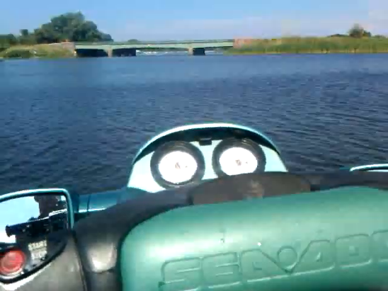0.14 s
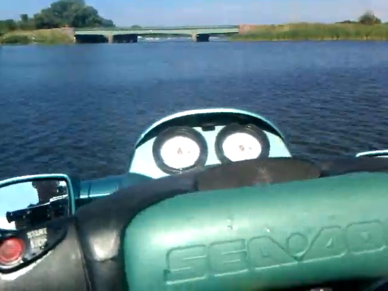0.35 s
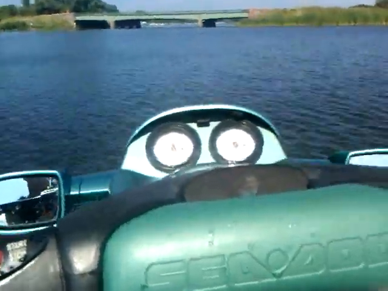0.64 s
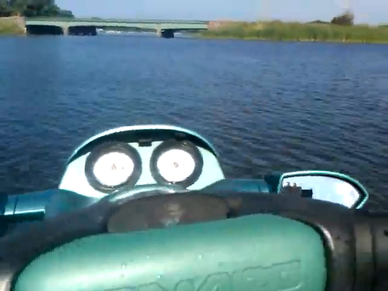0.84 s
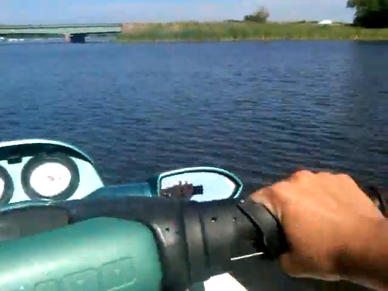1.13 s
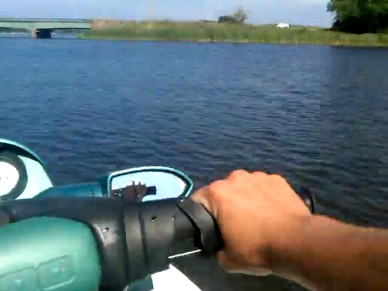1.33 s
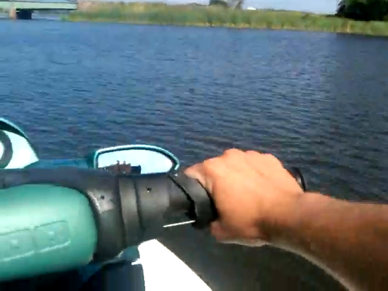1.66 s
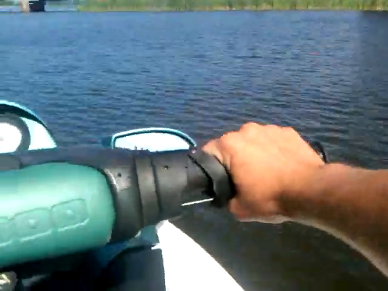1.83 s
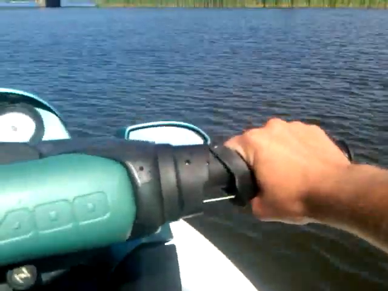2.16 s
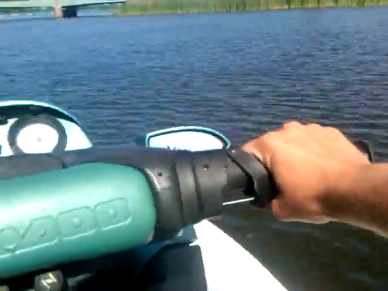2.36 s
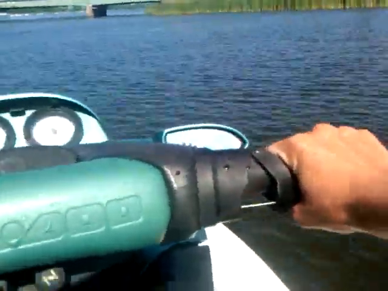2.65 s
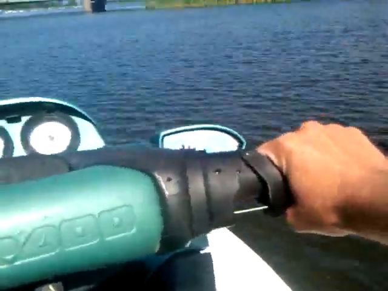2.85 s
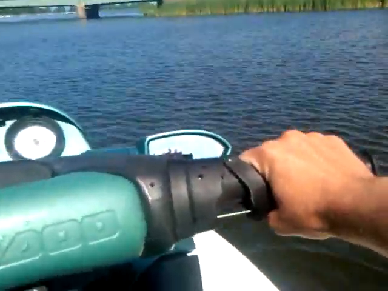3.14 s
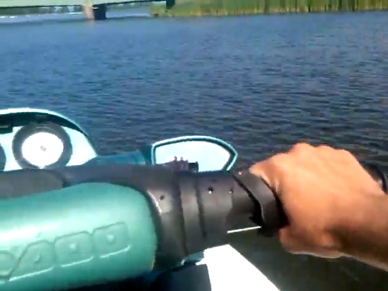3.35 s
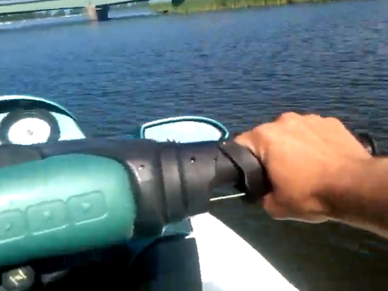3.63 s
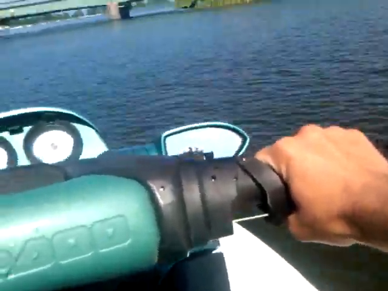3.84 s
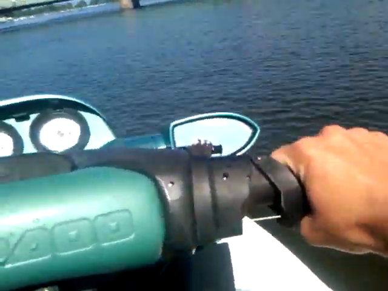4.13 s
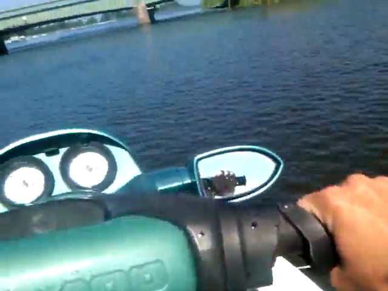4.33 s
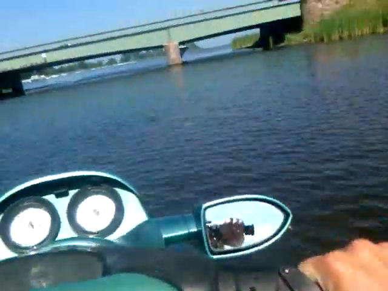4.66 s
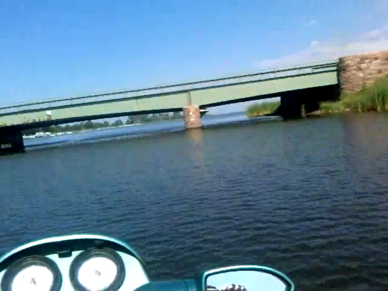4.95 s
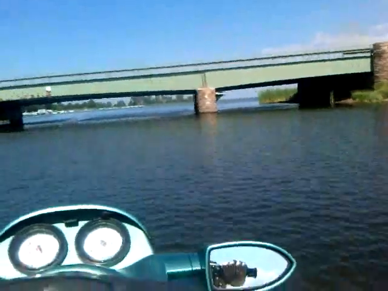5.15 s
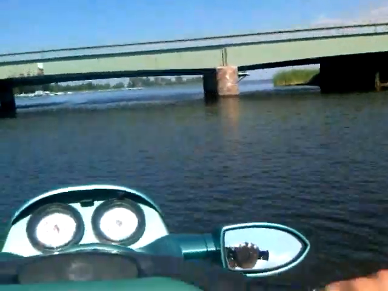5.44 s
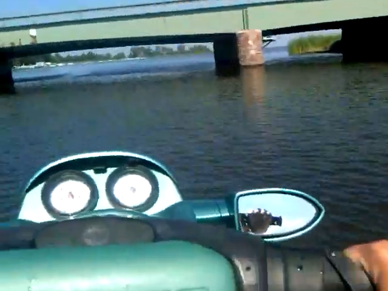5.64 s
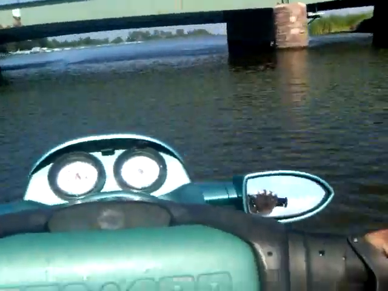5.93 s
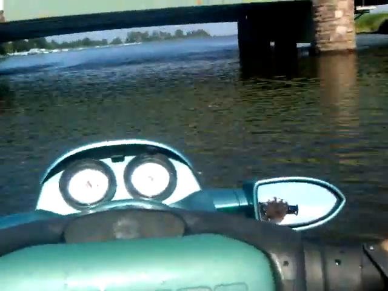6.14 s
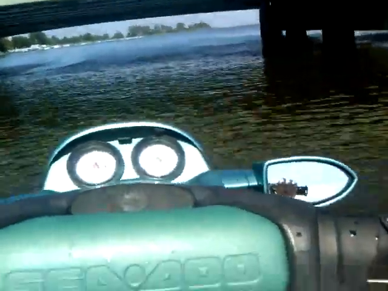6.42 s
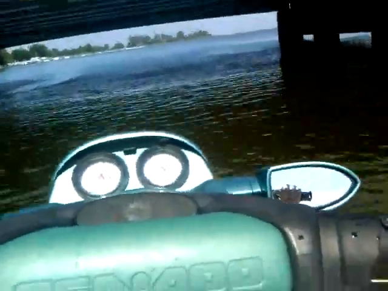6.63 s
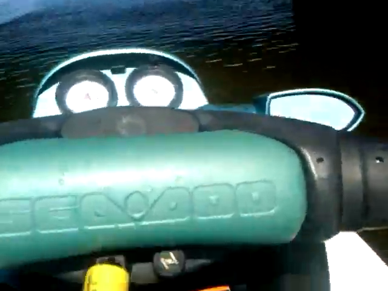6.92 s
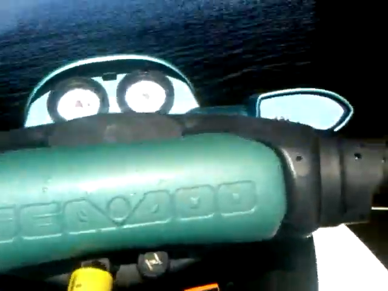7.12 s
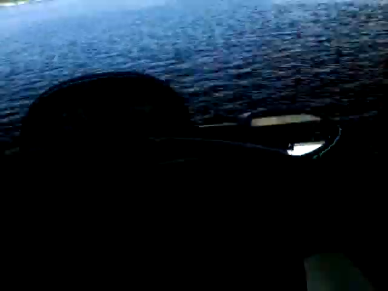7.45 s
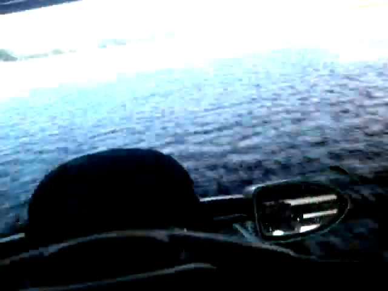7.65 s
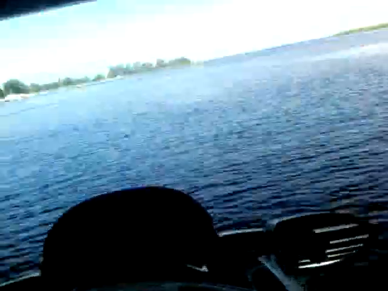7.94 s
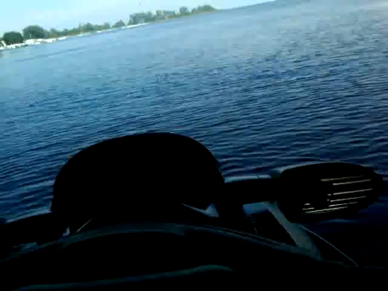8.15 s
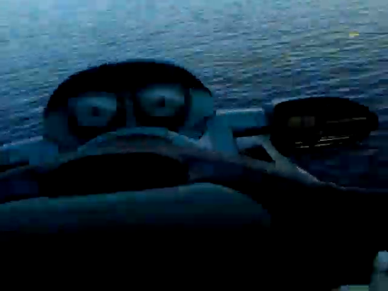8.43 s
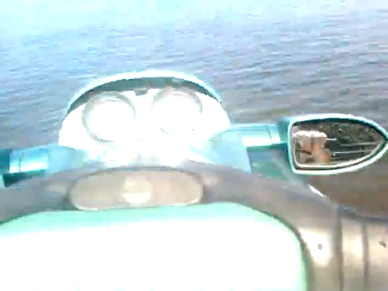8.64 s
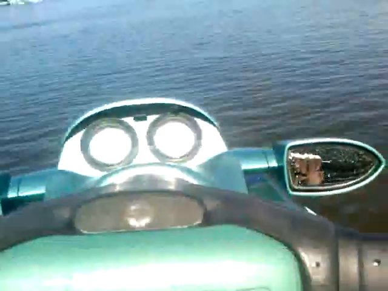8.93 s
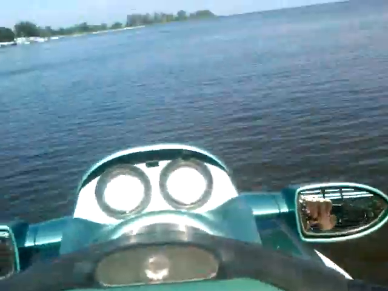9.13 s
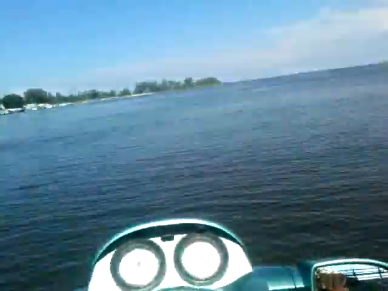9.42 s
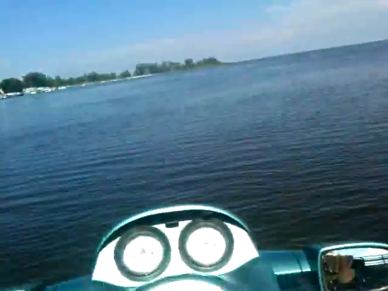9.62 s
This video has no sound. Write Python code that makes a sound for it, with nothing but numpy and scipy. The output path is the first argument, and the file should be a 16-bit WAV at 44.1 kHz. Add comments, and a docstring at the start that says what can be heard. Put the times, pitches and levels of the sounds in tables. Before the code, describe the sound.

A fast personal watercraft heard at its handlebar: a buzzing mid-low engine note, fluttering and uneven, is chopped by wind buffeting a clipping, dull-topped microphone. Thumping gusts briefly smother fine spray hiss, spatter and short splashes. The note stays level for seven seconds, falls as the rider backs off, and continues gliding downward to the end, with wind still rumbling.

```python
"""Personal watercraft easing off

A personal watercraft runs at speed over open water, then eases off the throttle after seven seconds.
Its engine and drive sound as sines locked to the shaft, with a noise rasp at each firing.
Wind is coloured noise plus short pressure swings; spray is spurting hiss, splashes and dull knocks.
The head wind overloads the rider's microphone: saturation chops it all into a rough, flat-topped roar.
"""
import sys
import numpy as np
from scipy import signal
from scipy.fft import rfft, irfft, next_fast_len
from scipy.io import wavfile
from scipy.ndimage import uniform_filter1d, map_coordinates

SR = 44100
rng = np.random.default_rng(int(sys.argv[2]) if len(sys.argv) > 2 else 0)


def file_out(sig):
    """Save sig as 16-bit WAV at sys.argv[1]."""
    # one column per channel
    cols = np.atleast_2d(sig).T
    # limit, then scale
    lim = np.clip(cols, -1, 1)
    pcm = np.round(lim * 32767).astype(np.int16)
    wavfile.write(sys.argv[1], SR, pcm)


N = 431286

# All levels in the tables are relative; the functions trim and mix them.
# crankshaft speed: t/s, f/Hz
SHAFT_SPEED = [(0, 113), (1.2, 113.6), (2.5, 113.2), (4, 113.4), (5.5, 113.2), (6.2, 113.8), (7.1, 113.6),
               (7.3, 112), (7.55, 108), (7.7, 101), (7.85, 95), (8, 90.5), (8.5, 83.5), (8.8, 80.7),
               (9.05, 78.5), (9.45, 75), (9.78, 70.5)]
# engine orders: multiple of the shaft speed, level/dB
ENGINE_ORDERS = [(1, -2.5), (2, -3.27), (3, 0.6), (4, -8.5), (5, -18.5), (7, -16), (9, -15.5), (10, -15.5),
                 (21, -19)]
# loudness of the engine: t/s, firing order level/dB, level of all other orders/dB
ENGINE_LEVEL = [(0, -22.5, -24), (.33, -28, -29), (.5, -25, -29.5), (.65, -25.5, -21.5),
                (.85, -21.5, -30.5), (1.18, -26.5, -26.5), (1.45, -30.5, -25.5), (1.75, -25, -23.5),
                (1.95, -28.5, -26), (2.2, -22, -25.5), (2.85, -25.5, -26.5), (3.05, -22.5, -24.5),
                (3.5, -26.5, -22.5), (4.05, -26.5, -26), (4.25, -32.5, -24.5), (4.5, -22.5, -21.5),
                (4.8, -36.5, -36.5), (5.15, -28.5, -31.5), (5.5, -37, -30.5), (5.85, -26, -28),
                (6.15, -25.5, -22), (6.5, -28, -28), (6.82, -38.5, -27.5), (7.05, -20.5, -22.5),
                (7.4, -33, -25.5), (7.8, -22.5, -25.5), (8.05, -32, -29), (8.25, -38.5, -49),
                (8.42, -27.5, -24), (8.54, -23, -32.5), (8.65, -36.5, -26), (8.8, -23, -37),
                (8.92, -32, -25), (9.03, -25, -12), (9.15, -30.5, -31), (9.33, -30.5, -26),
                (9.46, -25.5, -22), (9.59, -33.5, -39), (9.7, -24.5, -22), (9.78, -28.5, -38)]
# resonances of exhaust and hull, which each order lights up as it slides through: f/Hz, level/dB
PIPE_RESONANCE = [(70, -11.5), (113, 0.5), (165, -10), (215, 1.5), (250, -2.5), (280, -5), (315, -2),
                  (341, -0.5), (359, 11), (375, 13), (392, -6), (450, -2), (800, -2)]
# gusts that overload the diaphragm: t/s, length/s, push level/dB
GUST_EVENTS = [(0.058, 0.028, -6), (0.588, 0.034, -11.5), (0.686, 0.056, -11), (2.544, 0.039, -9),
               (2.815, 0.024, -10), (3.391, 0.035, -8.5), (3.959, 0.027, -9), (4.1, 0.024, -9),
               (4.319, 0.027, -1), (4.6, 0.015, -5.5), (4.886, 0.022, -11), (4.979, 0.015, -11),
               (5.063, 0.058, -6.5), (5.196, 0.028, -5), (5.382, 0.026, -8.5), (5.418, 0.016, -8.5),
               (5.491, .03, -10), (5.97, 0.043, -5), (6.042, 0.05, -11), (6.485, .02, -9.5),
               (6.599, 0.034, -3), (6.644, 0.019, -9.5), (6.768, 0.061, -14), (6.995, 0.04, -11),
               (7.493, 0.035, -6), (7.687, 0.02, -9.5), (7.91, 0.01, -5.5), (7.94, 0.044, -5),
               (8.201, 0.018, -8.5), (8.338, 0.016, -6.5), (8.422, 0.037, -3.5), (8.592, 0.033, -13),
               (8.695, 0.012, -11), (8.872, 0.028, -11), (8.919, 0.04, -8.5), (9.339, 0.032, -10.5)]
# head wind at the microphone: t/s, buffet level/dB, rush level/dB
WIND_LEVEL = [(0, -22.5, -25), (.65, -19.5, -23), (.85, -20.5, -22.5), (1.15, -29, -24.5),
              (1.35, -19, -23.5), (1.7, -18.5, -23), (2.2, -16, -21.5), (3.3, -21, -24), (4.1, -21.5, -24),
              (4.67, -21, -25.5), (4.78, -23.5, -30.5), (5.05, -18.5, -26), (5.26, -22.5, -30),
              (5.5, -20, -28), (6.15, -20, -22), (6.85, -21, -28), (7.13, -14, -22), (7.3, -22, -23),
              (7.7, -18, -23.5), (8.05, -18.5, -24.5), (8.25, -25, -30.5), (8.4, -23, -30),
              (8.53, -23, -25), (8.68, -23, -29.5), (8.8, -20.5, -28.5), (8.9, -21.5, -27), (9.1, -21, -26),
              (9.33, -19.5, -30), (9.5, -23, -33), (9.6, -20, -30), (9.78, -31, -31.5)]
# spectrum of the slow wind eddies: f/Hz, level per Hz/dB
BUFFET_SPECTRUM = [(8, -31), (22, 2), (40, 2), (80, -1.5), (150, -7), (300, -14.5), (600, -17), (1500, -38),
                   (4000, -86.5)]
# spectrum of the wind rush, shared by the engine's rasp: f/Hz, level per Hz/dB
RUSH_SPECTRUM = [(100, -32.5), (300, 0), (600, -3), (1100, -4.5), (1800, -2.5), (2500, -2), (3300, -10.5),
                 (5000, -21.5), (7500, -49.5)]
# spray thrown up by the hull: t/s, level/dB
SPRAY_SWELL = [(0, -40), (.75, -48.5), (1.0, -32.5), (1.35, -45), (1.8, -41), (2.1, -49), (2.55, -38.5),
               (2.9, -32), (3.8, -33.5), (4.5, -33.5), (5.3, -36), (6.3, -35), (6.85, -42), (7.15, -42),
               (7.7, -39.5), (8.5, -47.5), (9.5, -54), (9.78, -41)]
# spectrum of the spray hiss: f/Hz, level per Hz/dB
SPRAY_SPECTRUM = [(1000, -31), (2300, 5), (3300, -6.5), (3800, -8), (4020, 1.5), (4300, -4.5), (5200, -3),
                  (7400, -14)]
# slaps of spray: t/s, length/s, level/dB
SLAP_EVENTS = [(1.78, 0.11, -31), (3.28, 0.0039, -28), (4.294, 0.0098, -32), (4.66, 0.049, -31.5),
               (5.266, 0.017, -23.5), (5.94, 0.018, -31), (6.703, 0.015, -31), (7.185, 0.022, -29.5),
               (7.865, 0.024, -33), (7.898, 0.011, -24), (8.269, 0.0069, -27.5), (8.51, 0.11, -37.5),
               (8.666, 0.013, -35.5), (9.14, 0.06, -35.5)]
# splashes against the hull: t/s, length/s, pitch f/Hz, level/dB
SPLASH_EVENTS = [(1.608, 0.018, 882, -16.5), (3.212, 0.017, 2380, -32.5), (3.454, 0.026, 2205, -19.5),
                 (4.448, 0.016, 996, -20), (4.548, 0.023, 1110, -24), (4.661, 0.047, 985, -27),
                 (4.662, 0.013, 2295, -22), (4.857, 0.021, 2020, -23), (4.935, 0.011, 1810, -25),
                 (7.134, 0.092, 1000, -19.5), (7.146, 0.11, 1913, -27.5), (7.381, 0.049, 1304, -32),
                 (7.566, 0.045, 1884, -25), (7.879, 0.063, 1507, -26.5), (8.285, 0.01, 1693, -28),
                 (8.528, 0.071, 796, -33.5), (8.543, 0.12, 2240, -28.5), (8.82, .02, 1400, -32),
                 (8.983, 0.025, 1186, -24), (9.268, 0.028, 850, -24.5), (9.48, 0.18, 649.6, -26)]
# colour of the microphone: f/Hz, level/dB
MICROPHONE_COLOUR = [(20, 2.5), (300, 3.5), (1000, -4), (2500, -7.5), (3200, -8), (3750, -8.5),
                     (4050, -2.5), (4600, -4.5), (7400, -5)]

SPLASH_WIDTH = .75  # knot rate of a splash's bubble cloud, as a share of its pitch
GUST_HZ = 26.86  # how fast the pressure swings within a gust
HAND_S = .00086  # delay of the reflection off the hand
TOP_HZ = 7350  # edge of the treble cut-off


def amp(db):
    """Decibels to gain."""
    return 10 ** (np.asarray(db) / 20)


def unit(x):
    """Scale to rms 1."""
    return x / np.sqrt(np.mean(x ** 2) + 1e-20)


def along(points, hz):
    """Read a table of (f/Hz, value) at any frequency, on a log axis."""
    f, v = np.transpose(points)
    return np.interp(np.log(hz + 1), np.log(f + 1), v)


def curves(rows):
    """Draw each column after the time as a curve with one value per sample."""
    s, *cols = np.transpose(rows)
    return [np.interp(np.arange(N) / SR, s, c) for c in cols]


def wobble(rate):
    """A smooth random curve with `rate` knots a second, looping over 2048 knots."""
    coarse = np.arange(0, N + 16, 16)
    knots = rng.standard_normal(2048)
    curve = map_coordinates(knots, [coarse * rate / SR], mode="wrap")
    return np.interp(np.arange(N), coarse, curve)


def filtered(x, response):
    """Multiply the spectrum of x by a complex response of frequency."""
    m = next_fast_len(N + SR // 2)  # spare room for tails
    spectrum = rfft(x, m) * response(np.fft.rfftfreq(m, 1 / SR))
    return irfft(spectrum, m)[:N]


def noise(spectrum):
    """Coloured noise of rms 1."""
    return unit(filtered(rng.standard_normal(N), lambda hz: amp(along(spectrum, hz))))


def patchy(x, depth_db):
    """Give a noise short patches of random colour, rms 1."""
    z = signal.stft(x, nperseg=512)[2]
    field = uniform_filter1d(rng.standard_normal(z.shape), size=7, axis=0)  # smooth over frequency
    field = uniform_filter1d(field, size=5, axis=1)  # smooth over time
    return unit(signal.istft(z * amp(depth_db * unit(field)), nperseg=512)[1][:N])


def swells(rows):
    """A round-shouldered swell for each (t/s, length/s, level/dB) row."""
    t = np.arange(N) / SR
    shapes = []
    for s, length, db in rows:
        distance = np.minimum(np.abs(2 * (t - s) / length), 3)
        shapes.append(amp(db) * np.exp(-distance ** 3))
    return np.array(shapes)


def engine(tone_db=4, rasp_db=-11, mellowing=2.6, misfire_db=4.5):
    """Exhaust and drive orders locked to the shaft, with an uneven rasp of gas at each firing."""
    shaft_hz, = curves(SHAFT_SPEED)
    firing_db, others_db = curves(ENGINE_LEVEL)
    # the load on the jet pump makes the speed hunt a little
    hunting_hz = shaft_hz * (1 + .003 * wobble(12))
    angle = 2 * np.pi * np.cumsum(hunting_hz) / SR
    # as the throttle closes, all orders but the firing order (the third) weaken
    load = (shaft_hz / shaft_hz.max()) ** mellowing
    # uneven combustion roughens every order
    uneven = amp(2.0 * wobble(35))
    firing = amp(firing_db)
    others = amp(others_db) * load
    tone = np.zeros(N)
    for order, db in ENGINE_ORDERS:
        # the higher the order, up to the tenth, the more it comes and goes
        flutter_db = .9 * np.sqrt(min(order, 10)) * wobble(10)
        resonance_db = along(PIPE_RESONANCE, order * shaft_hz)
        size = amp(db + flutter_db + resonance_db) * (firing if order == 3 else others)
        tone += size * np.sin(order * angle + rng.uniform(0, 2 * np.pi))
    # three bursts of gas per turn of the shaft, of uneven strength
    bursts = noise(RUSH_SPECTRUM) * (1 + np.cos(3 * angle)) ** 2
    rasp = unit(bursts * amp(misfire_db * wobble(340)))
    return amp(tone_db) * tone * uneven + amp(rasp_db) * firing * rasp


def gusts(smothers_db=-5):
    """Vortices swing the diaphragm and smother finer sounds: returns (push, gain of the finer sounds)."""
    t = np.arange(N) / SR
    strength = swells(GUST_EVENTS)
    # each gust peaks at its centre, pushing in or pulling out at random
    swings = [rng.choice([-1, 1]) * np.cos(2 * np.pi * GUST_HZ * (t - s)) for s, _, _ in GUST_EVENTS]
    push = np.sum(strength * swings, axis=0)
    smothered = 1 / (1 + strength.sum(axis=0) / amp(smothers_db))
    return push, smothered


def wind(buffet_gain_db=4.0, rush_gain_db=-4.5):
    """Slow eddies buffet the microphone and small ones rush past it: returns (buffet, rush)."""
    buffet_db, rush_db = curves(WIND_LEVEL)
    lumps = amp(2.2 * wobble(30))
    buffet = amp(buffet_db + buffet_gain_db) * unit(noise(BUFFET_SPECTRUM) * lumps)
    eddies = patchy(noise(RUSH_SPECTRUM), 3.2) * amp(4.2 * wobble(140))
    rush = amp(rush_db + rush_gain_db) * unit(eddies)
    return buffet, rush


def spray(hiss_db=-2, spurt_db=5.5, slap_db=-4):
    """Water hisses off the hull in quick spurts, with a sharper burst when a wave slaps it."""
    spray_db, = curves(SPRAY_SWELL)
    spurts = np.tanh(wobble(110))
    sheet = amp(spray_db + hiss_db + spurt_db * spurts)
    slaps = amp(slap_db) * swells(SLAP_EVENTS).sum(axis=0)
    return (sheet + slaps) * patchy(noise(SPRAY_SPECTRUM), 2.8)


def splashes():
    """Each splash is a short cloud of bubbles: a broad noise centred on one pitch."""
    t = np.arange(N) / SR
    out = np.zeros(N)
    for s, length, hz, db in SPLASH_EVENTS:
        turn = 2 * np.pi * hz * t
        cloud = wobble(SPLASH_WIDTH * hz) * np.sin(turn) + wobble(SPLASH_WIDTH * hz) * np.cos(turn)
        out += swells([(s, length, db)])[0] * cloud
    return out


def spatter(drops_db=-8, centre_hz=1400, spread=0.444, cycles=1.15, scatter_db=1.5, count=1500):
    """Lumps of water patter on the hull as short, dull decaying knocks; they grow with the wind rush."""
    _, rush_db = curves(WIND_LEVEL)
    out = np.zeros(N + SR)
    t = np.arange(SR // 50) / SR  # each knock lasts 20 ms
    starts = rng.integers(0, N, count)
    draws = rng.standard_normal((count, 2)).clip(-2, 2)
    for start, (pitch, size) in zip(starts, draws):
        turns = centre_hz * np.exp(spread * pitch) * t
        age = turns / cycles
        knock = age * np.exp(-age) * np.sin(2 * np.pi * turns)
        out[start:start + len(t)] += amp(scatter_db * size) * knock
    return amp(rush_db + drops_db) * unit(out[:N])


def scene():
    """Engine, wind and water at the handlebar."""
    drone = engine()
    push, smothered = gusts()
    buffet, rush = wind()
    fine = rush + spray() + splashes() + spatter()
    return (drone + push + buffet + smothered * fine)[None]


def record(dry, drive_db=33, ceiling_db=-20.0, ripple_db=5.5, ripple_hz=1400, choke_db=-11,
           port_hz=4010, port_width_hz=120, port_db=2, hand_db=-22):
    """The overloaded microphone flattens the waves; its port rings, and the treble is cut off."""
    pressure = dry[0]
    flat = amp(ceiling_db) * np.tanh(amp(drive_db) * pressure)
    # fine ripple still rides on the flat tops, until a strong push chokes it too
    ripple = amp(ripple_db) * filtered(pressure, lambda hz: hz ** 2 / (hz ** 2 + ripple_hz ** 2))
    out = flat + ripple / (1 + np.abs(pressure / amp(choke_db)) ** 3)

    def port(hz):
        """The port adds a narrow resonance to the direct sound."""
        damping = 1j * hz * port_width_hz
        return 1 + amp(port_db) * damping / (port_hz ** 2 - hz ** 2 + damping)

    out = filtered(out, lambda hz: amp(along(MICROPHONE_COLOUR, hz)) * port(hz))
    # the coupling capacitor lets each flat top sag
    out = signal.sosfilt(signal.butter(1, 1.5, "high", fs=SR, output="sos"), out)
    # a short reflection off the hand that holds the microphone ruffles each edge
    out = filtered(out, lambda hz: 1 + amp(hand_db) * np.exp(-2j * np.pi * hz * HAND_S))
    # the steep cut-off rings briefly after each edge
    return signal.sosfilt(signal.ellip(10, .2, 90, TOP_HZ, fs=SR, output="sos"), out)[None]


dry = scene()
out = record(dry)
file_out(out)
```